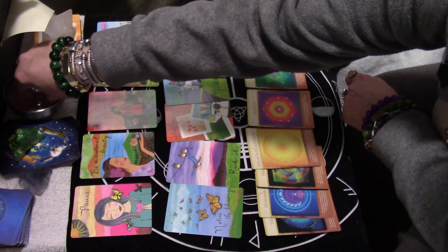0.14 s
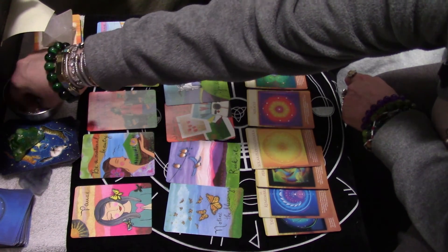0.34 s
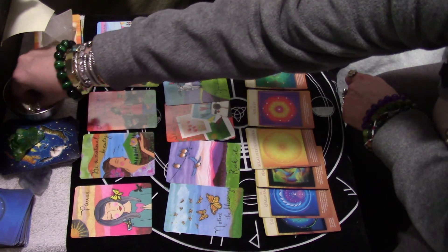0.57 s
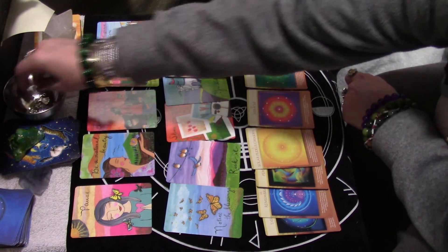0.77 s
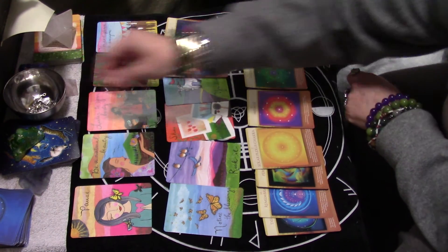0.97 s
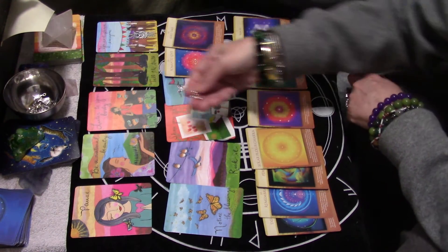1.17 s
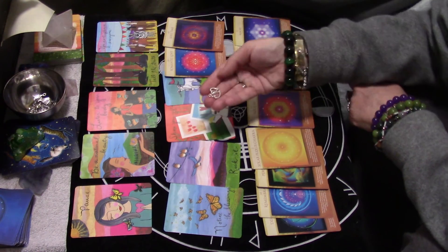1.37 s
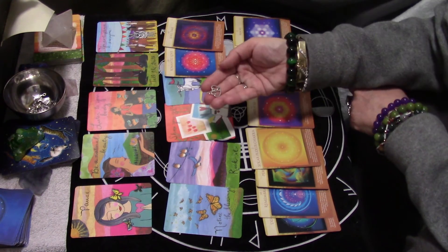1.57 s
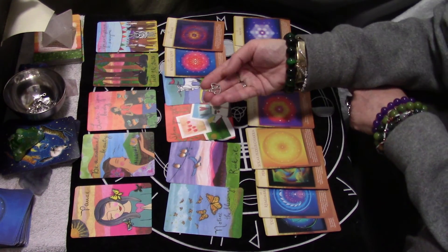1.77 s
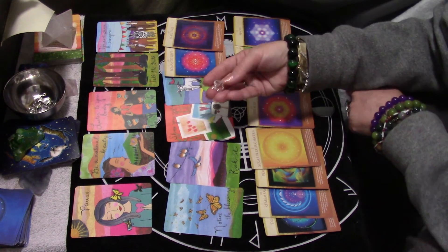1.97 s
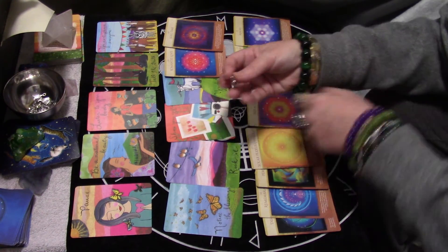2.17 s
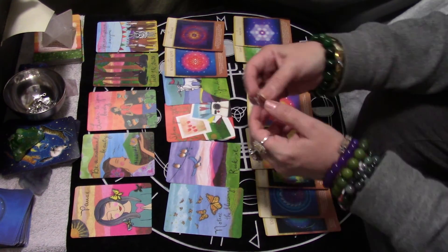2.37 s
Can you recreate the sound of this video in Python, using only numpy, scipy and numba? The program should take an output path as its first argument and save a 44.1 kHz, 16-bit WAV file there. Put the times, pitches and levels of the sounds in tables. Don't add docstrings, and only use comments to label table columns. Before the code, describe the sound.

Hand stirring metal charms in a metal bowl, bright dense rattling, then sparse delicate clinks

```python
import sys
import numpy as np
from scipy import signal
from scipy.fft import rfft, irfft
from scipy.io import wavfile
from scipy.ndimage import uniform_filter1d
from numba import njit

SR = 44100
rng = np.random.default_rng(int(sys.argv[2]) if len(sys.argv) > 2 else 0)


def makeup_ratio(level_db):
    decades = np.asarray(level_db, float) / 20
    return 10 ** decades


def output_pcm(signal):
    pcm = np.clip(np.atleast_2d(signal).T, -1, 1) * 32767
    wavfile.write(sys.argv[1], SR, np.round(pcm).astype(np.int16))


N = 107295

# [f/Hz, level/dB per Hz]
AIR_SPECTRUM = [(15, -54), (25, -24), (100, -13.5), (236, -3), (659, -12), (775, -13), (988, -12.5),
                (2050, -20), (2480, -19), (16000, -37)]
# [f/Hz, level/dB]
AIR_SIDE = [(40, -5), (150, -8), (300, -6), (700, -6.5), (2000, -8), (8000, -14.5)]
# [t/s, length/s, level/dB, low against high wall modes/dB, base thuds/dB]
STROKES = [
    (0, 0.044, -43, -5.5, -4),
    (0.06, 0.019, -24.5, -5, -13),
    (0.092, 0.1196, -22, -4.5, -11.5),
    (0.236, 0.1, -28.5, -7.5, -11.5),
    (0.353, 0.081, -27.5, -7, -12),
    (0.449, 0.052, -35, -5, -6.5),
    (0.519, 0.16, -25, -5, -18),
    (.575, 0.13, -26.5, -3, -16),
]
# [f/Hz, spread/Hz, level/dB, t60/s]
WALL_MODES = [(3000, 170, -9, 0.0456), (3532, 100, -9, 0.039), (3910, 44, -5.5, 0.023),
              (4500, 400, -11.5, 0.053), (5400, 76, -3, 0.031), (5810, 190, -2, 0.0305),
              (7400, 610, -7, 0.03), (8170, 850, -10.5, 0.06), (9900, 130, -7.5, 0.025),
              (10590, 160, -11, 0.041), (12140, 900, -20, .012), (14190, 1000, -12, .012)]
# [f/Hz, spread/Hz, level/dB, t60/s]
BASE_MODES = [(756.6, 113, -12.5, 0.023), (1015, 140, -4, .03), (1418.7, 56, -6, 0.075),
              (1595, 60, -0.5, .05), (2230, 220, -9.5, 0.045)]
# [t/s, peak level/dB, loudest f/Hz]
WALL_KNOCKS = [(0.0011, -25.5, 4120), (0.0197, -23.5, 3830), (0.0388, -42, 2870), (0.0495, -15, 5554),
               (0.0532, -9, 3970), (0.0603, -8, 2988), (0.0656, -8, 5455), (0.0678, -13, 5750),
               (0.0717, -24.5, 5700), (0.0929, -10.5, 3940), (0.0977, -18, 5440), (0.1013, -8.5, 6020),
               (0.1059, -5.5, 5710), (0.1119, -2, 5360), (0.1167, -12, 5400), (0.1208, -7.5, 5860),
               (0.1278, 0, 5290), (0.1374, -7.5, 3920), (0.1444, -13, 3790), (0.1486, -13, 3880),
               (0.154, -16, 5400), (0.1651, -10.5, 5500), (0.1696, -15.5, 5580), (0.1763, -14, 5400),
               (0.188, -17, 5460), (0.1927, -13, 3850), (0.198, -14.5, 5420), (0.2013, -20.5, 5640),
               (0.209, -23, 5595), (0.2161, -27, 3830), (0.2268, -26, 8550), (0.2374, -26, 3320),
               (0.2435, -26, 8160), (0.2506, -19.5, 5540), (0.2572, -13.5, 5800), (0.2701, -7.5, 5540),
               (0.2732, -12.5, 5800), (0.2814, -16.5, 3040), (0.2971, -28, 5190), (0.3071, -20.5, 8700),
               (0.3157, -19, 8450), (0.3366, -31.5, 5250), (0.3401, -34, 6200), (0.3478, -26, 3017),
               (0.3559, -18, 9920), (0.3638, -8, 8750), (0.3731, -21, 7310), (0.378, -18, 7610),
               (0.3873, -6.5, 5880), (0.3978, -10.5, 6240), (0.4034, -19, 5700), (0.4078, -12.5, 5580),
               (0.4132, -20, 5510), (0.4232, -20, 5360), (0.4291, -15.5, 5820), (0.443, -36, 5770),
               (0.4519, -31, 5470), (0.4678, -29, 6280), (0.4712, -26, 5480), (0.4817, -23, 5600),
                    (0.5023, -19.5, 5790), (0.5144, -16.5, 5490), (0.522, -28.5, 5580), (0.5252, -18, 5790),
                    (0.529, -16, 5430), (0.5368, -18, 5840), (0.541, -19, 5670), (0.5445, -18.5, 5380),
                    (0.5501, -9.5, 5470), (0.5528, -16, 5500), (0.5598, -11.5, 5570), (0.5643, -19, 5570),
                    (0.5714, -13.5, 5300), (0.575, -17, 5400), (0.5833, -10.5, 3760), (0.5924, -17, 5970),
                    (0.5976, -17, 4010), (0.6023, -20, 3500), (0.6078, -22, 3920), (0.62, -23, 5620),
                    (0.6244, -17, 5930), (0.6295, -9, 3940), (0.6327, -10.5, 5760), (0.6411, -12.5, 3470),
                    (0.6498, -15, 5720), (0.6638, -7.5, 5420), (0.674, -13, 3750), (0.6779, -17, 5510),
                    (0.6816, -26, 3790), (0.6963, -18, 3980), (0.7036, -23, 5624), (0.713, -24, 6800)]
# [t/s, peak level/dB]
BOWL_BUMPS = [
    (0.0997, -18.5),
    (.104, -17.5),
    (.19, -27),
    (.462, -30),
    (.468, -28),
]
# [t/s, peak level/dB]
BASE_THUDS = [(0.1002, -19), (0.1114, -17.5), (0.1371, -16.5), (0.1585, -20), (0.2124, -28.5),
              (0.2438, -27), (0.2673, -31), (0.3187, -32), (0.3566, -22), (0.4075, -24.5), (0.4623, -26.5),
              (0.5501, -32.5), (0.5841, -25.5), (0.5994, -26), (0.6225, -29), (0.6629, -24)]
# [t/s, level/dB, f/Hz, t60/s]
FREE_CHARMS = [
    (.112, -25, 10590, .22),
    (.158, -25, 9840, .1),
    (.112, -25, 3838, .25),
    (.128, -22, 5390, .16),
    (.585, -31, 10300, .2),
    (2.224, -38, 9450, .035),
    (2.005, -42, 7950, .06),
    (.135, -27, 3722, .16),
]
# [from t/s, to t/s, level/dB]
CHAIN_RATTLE = [
    (0.806, 1.287, -61.5),
    (1.995, 2.095, -56.5),
    (2.104, 2.257, -53.5),
    (2.261, 2.379, -68),
]
# [t/s, peak level/dB, loudest f/Hz]
LIFTED_CLINKS = [(0.8133, -47, 9500), (0.832, -36.5, 9250), (0.9129, -38.5, 8820), (0.9498, -47, 9760),
                 (1.0266, -44.5, 7860), (1.0417, -32.5, 8400), (1.0464, -41, 8830), (1.1643, -34.5, 7400),
                 (1.1671, -32, 9160), (1.187, -36.5, 9900), (1.1944, -58, 8690), (1.2197, -34.5, 10500),
                 (1.2573, -54, 8444), (1.3879, -45.5, 8470), (1.4107, -34, 9310), (1.4173, -31, 7100),
                 (1.425, -47, 9100), (1.8272, -50, 10600), (1.9518, -38.5, 7200)]
# [t/s, peak level/dB, loudest f/Hz]
PALM_CLINKS = [(2.0035, -33.5, 8020), (2.0104, -35.5, 7800), (2.0254, -39, 7170), (2.0426, -40, 8800),
               (2.0592, -35, 7900), (2.0644, -35, 7660), (2.0732, -37.5, 10200), (2.1074, -51, 9500),
               (2.1192, -34.5, 7180), (2.125, -43, 7220), (2.1318, -34, 9200), (2.1524, -43, 7860),
               (2.1603, -48, 6950), (2.1739, -35, 10600), (2.1909, -25, 5030), (2.2024, -34, 4700),
               (2.2115, -37, 9740), (2.2161, -35.5, 9900), (2.2214, -35, 9900), (2.2273, -26.5, 9210),
               (2.2494, -58, 8500), (2.273, -39, 11400), (2.2844, -50, 10920), (2.3114, -39, 8000),
               (2.3174, -49, 7000), (2.3401, -41, 8290)]
# [t/s, peak level/dB, f/Hz]
BEAD_KNOCKS = [(1.036, -46.5, 2790), (1.325, -47, 2610), (1.3468, -43.5, 2230), (1.356, -50, 3195),
               (1.5247, -46.5, 2540), (1.924, -48.5, 2520), (2.1908, -43.5, 3370), (2.2236, -42.5, 3165),
               (2.3111, -49, 3130)]
# [t/s, peak level/dB, lowest f/Hz]
BEAD_TICKS = [
    (2.1922, -32, 2500),
    (2.2267, -44, 2500),
    (2.2737, -36.5, 4500),
    (2.2851, -42, 5000),
    (2.3115, -39, 3500),
    (1.0418, -46, 3000),
]

AIR_DB, FAN_HZ, FAN_WIDTH_HZ, FAN_DB = -58.5, 184.1, 2.7, -67.5
ATTACK_S, SAG_DB, RELEASE_DB_PER_S, REST_DB = 0.014, 6, 559.5, -43.5
PLACE_DB, SIZE_DB = 3.5, 2
LOW_WALL_HZ, WALL_FROM_HZ = 4700, 2300
STIR_WALL_DB, STIR_BASE_DB = -13, -2
KNOCK_DB, BOUNCE_S, KNOCK_DAMPING = -17, 0.0025, 0.5
KNOCK_TOP_DB, LOUDEST_MODE_DB = 3.5, 10.5
ROOM_T60_S, ROOM_DB, ROOM_SIDE_DB = 0.14, -19, -5
CHARM_LOW_HZ, CHARM_HIGH_HZ, CHARM_FROM_HZ = 6540, 15740, 5300
CHARM_TILT_DB, CHARM_DB, CHARM_T60_S = -7, -10, 0.022
BEAD_T60_S, TICK_S = 0.011, 0.0011
BOWL_FROM_HZ, SIDE_FROM_HZ = 450, 5400
BOWL_SIDE_DB, PALM_SIDE_DB = -21, -29
RIM_S, RIM_SIDE_DB = 0.004, -20.5
TOP_HZ = 15850


def level(x, db):
    return x * makeup_ratio(db) / np.sqrt(np.mean(x ** 2))


def coloured(hz, db):
    log_f = np.log(np.fft.rfftfreq(N, 1 / SR) + 1)
    gain = makeup_ratio(np.interp(log_f, np.log(hz), db))
    return irfft(rfft(rng.standard_normal(N)) * gain, N)


def hum():
    hz, db = np.array(AIR_SPECTRUM).T
    side_hz, side_db = np.array(AIR_SIDE).T
    side_db = db + np.interp(np.log(hz), np.log(side_hz), side_db)
    air = level(np.array([coloured(hz, db), coloured(hz, side_db)]), AIR_DB)
    b, a = signal.iirpeak(FAN_HZ, FAN_HZ / FAN_WIDTH_HZ, fs=SR)
    fan = level(signal.lfilter(b, a, rng.standard_normal(N)), FAN_DB)
    return air + fan * np.array([[1], [0.2]])


def above(x, hz, order=4):
    return signal.sosfilt(signal.butter(order, hz, "high", fs=SR, output="sos"), x)


@njit
def rings(length, start, turn, fade, size):
    out = np.zeros(length)
    for k in range(len(start)):
        p, z = np.exp(1j * turn[k] - fade[k]), size[k] + 0j
        for i in range(start[k], min(length, start[k] + int(7 / fade[k]))):
            out[i] += z.imag
            z *= p
    return out


def ring(s, hz, t60, size):
    s, hz, t60, size = (np.ravel(v) * 1.0 for v in np.broadcast_arrays(s, hz, t60, size))
    turn = 2 * np.pi * np.clip(hz, 50, SR / 2.2) / SR
    fade = np.log(1000) / (t60 * SR)
    return rings(N, (s * SR).astype(np.int64), turn, fade, size)


def strike(s, db, modes, damping=0.85, low_db=0.0, top_db=0.0):
    hz, spread, mode_db, t60 = np.array(modes).T
    detune, strength, sign = rng.standard_normal((3, len(s), len(hz)))
    db = db[:, None] + mode_db + PLACE_DB * np.clip(strength, -3, 1.5)
    db = db + low_db * (hz < LOW_WALL_HZ) + top_db * (hz > 1.5 * LOW_WALL_HZ)
    return ring(s[:, None], hz + spread * detune, t60 * damping, np.sign(sign) * makeup_ratio(db))


def stir_at(s):
    start, length, db, low_db, thud_db = np.array(STROKES).T
    age = s[:, None] - start
    shape = db - SAG_DB * np.clip(age / length, 0, 1)
    shape -= RELEASE_DB_PER_S * np.maximum(age - length, 0)
    shape += 20 * np.log10(np.clip(age / ATTACK_S, 1e-4, 1))
    k = shape.argmax(axis=1)
    rest_db = np.where(s < start[-1] + length[-1], REST_DB, -120)
    return np.maximum(shape.max(axis=1), rest_db), low_db[k][:, None] + 6, thud_db[k]


def stirring(count=2000):
    s = rng.uniform(0, STROKES[-1][0] + STROKES[-1][1] + 0.06, count)
    db, low_db, thud_db = stir_at(s)
    hit_db = db + SIZE_DB * np.minimum(rng.exponential(size=count), 4)
    wall = makeup_ratio(STIR_WALL_DB) * strike(s, hit_db, WALL_MODES, low_db=low_db)
    base = makeup_ratio(STIR_BASE_DB) * strike(s[::4], (hit_db + thud_db)[::4], BASE_MODES[1:])
    return above(wall, WALL_FROM_HZ) + base


def knocks(count=3):
    s, db, hz = np.array(WALL_KNOCKS).T
    hit_db = db + KNOCK_DB
    low_db = stir_at(s)[1]
    out = ring(s, hz, 0.018, makeup_ratio(hit_db + LOUDEST_MODE_DB))
    for k in range(count):
        late = BOUNCE_S * rng.random(len(s)) * (k > 0)
        out = out + strike(s + late, hit_db, WALL_MODES, KNOCK_DAMPING, low_db, KNOCK_TOP_DB)
    return above(out, WALL_FROM_HZ)


def room(x):
    t = np.arange(SR // 2) / SR
    tail = rng.standard_normal((2, len(t))) * makeup_ratio(-60 * t / ROOM_T60_S) * (t > 0.004)
    tail *= makeup_ratio([[ROOM_DB], [ROOM_DB + ROOM_SIDE_DB]]) / np.sqrt(np.sum(tail[0] ** 2))
    return signal.fftconvolve(x[None], tail)[:, :N]


def bumps():
    return strike(*np.array(BOWL_BUMPS).T, BASE_MODES[:3])


def thuds():
    s, db = np.array(BASE_THUDS).T
    return above(strike(s, db - 4, BASE_MODES[2:4]), 1100)


def free_rings():
    s, db, hz, t60 = np.array(FREE_CHARMS).T
    return ring(s, hz, t60, makeup_ratio(db))


def charms(s, db, hz, count=30):
    pitch, weakness, bounce, sign, decay = rng.random((5, len(s), count))
    side_hz = CHARM_LOW_HZ * (CHARM_HIGH_HZ / CHARM_LOW_HZ) ** pitch
    side_db = (db + CHARM_DB)[:, None] + CHARM_TILT_DB * np.log2(side_hz / 8000) - 10 * weakness
    late = s[:, None] + 0.00086 + 0.0051 * bounce ** 3
    t60 = CHARM_T60_S * (0.044 + decay ** 2)
    brief = ring(late, side_hz, t60, np.sign(sign - 0.5) * makeup_ratio(side_db))
    main = ring(s + 0.0007, hz, CHARM_T60_S, makeup_ratio(db - 11))
    return main + above(brief, CHARM_FROM_HZ)


def rattle(count=40):
    out = np.zeros(N)
    for start, end, db in CHAIN_RATTLE:
        when, strength, pitch = rng.random((3, count))
        out += charms(start + (end - start) * when, db + 8 * strength, 7000 + 3500 * pitch)
    return out


def clinks():
    return charms(*np.vstack([LIFTED_CLINKS, PALM_CLINKS]).T)


def beads():
    s, db, hz = np.array(BEAD_KNOCKS).T
    mode_hz = hz[:, None] * [0.99, 0.595, 0.83, 1.435]
    mode_db = db[:, None] + [-4.5, -6, -3.5, -13.5]
    t60 = BEAD_T60_S * np.array([1.9, 0.97, 0.71, 1.04])
    return ring(s[:, None], mode_hz, t60, makeup_ratio(mode_db))


def ticks():
    t = np.arange(N) / SR
    out = np.zeros(N)
    for s, db, hz in BEAD_TICKS:
        noise = uniform_filter1d(rng.standard_normal(N), size=2)
        burst = noise * (t > s) * np.exp(-np.abs(t - s) / TICK_S)
        out += makeup_ratio(db + 3.5) * above(burst, hz, order=2)
    return out


def scene():
    bowl = above(stirring() + knocks() + bumps() + thuds() + free_rings(), BOWL_FROM_HZ, order=3)
    palm = rattle() + clinks() + beads() + ticks()
    rim = rng.standard_normal(int(RIM_S * SR))
    scatter = makeup_ratio(RIM_SIDE_DB) * np.convolve(bowl, rim / np.linalg.norm(rim))[:N]
    wet = room(bowl + palm)
    width = makeup_ratio(BOWL_SIDE_DB) * bowl + scatter - makeup_ratio(PALM_SIDE_DB) * palm + wet[1]
    mid, side = hum() + np.array([bowl + palm + wet[0], above(width, SIDE_FROM_HZ, order=2)])
    return np.array([mid + side, mid - side])


def top_cut(x):
    return signal.sosfilt(signal.butter(12, 16620, fs=SR, output="sos"), x)


def record(dry):
    low_pass = signal.ellip(8, 0.2, 60, TOP_HZ, fs=SR, output="sos")
    mix = signal.sosfilt(low_pass, dry)
    return top_cut(mix)


dry = scene()
out = record(dry)
output_pcm(out)
```